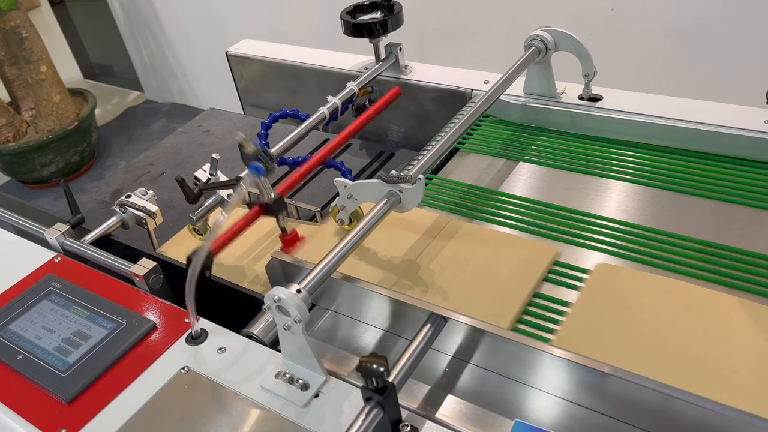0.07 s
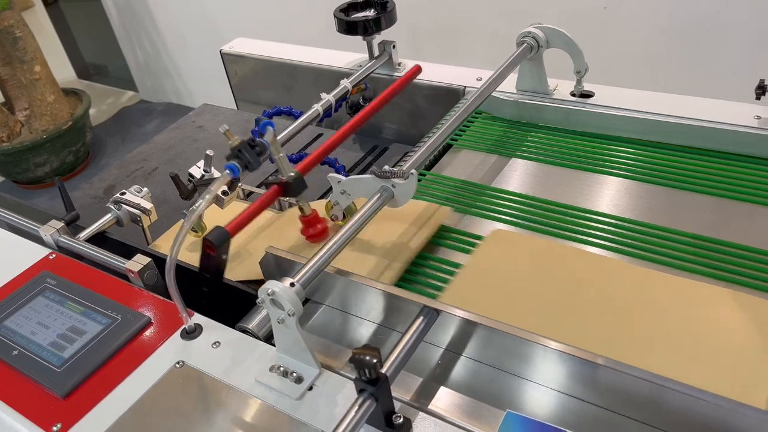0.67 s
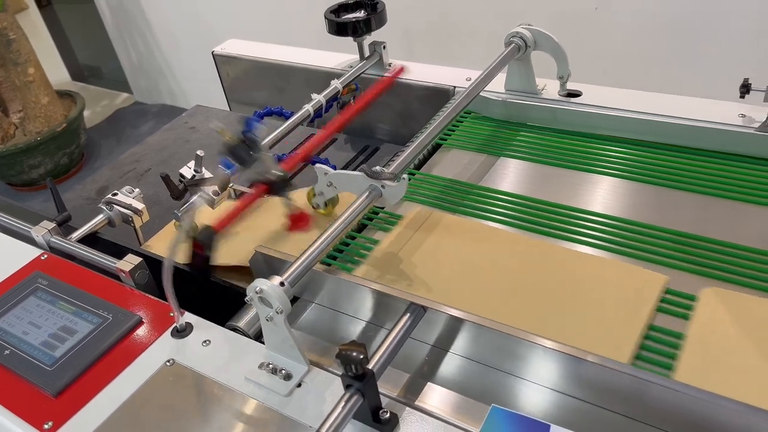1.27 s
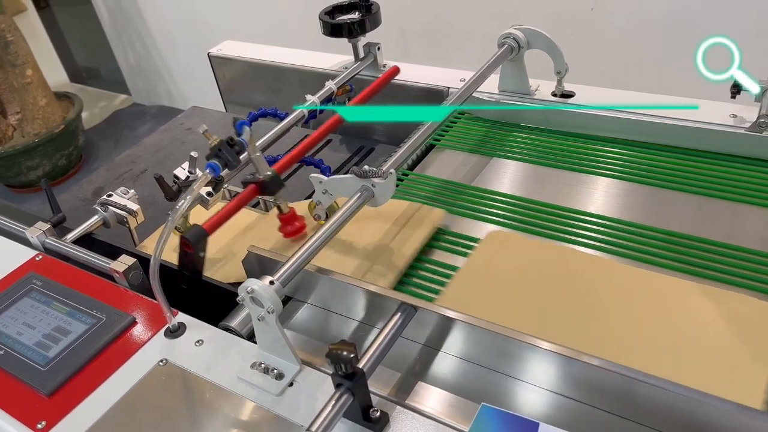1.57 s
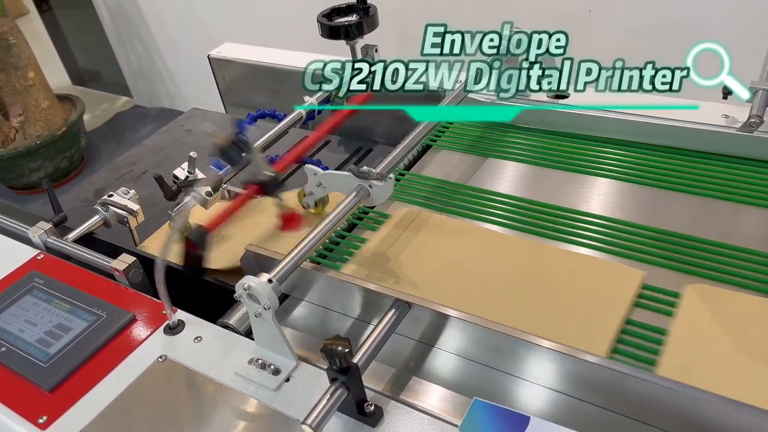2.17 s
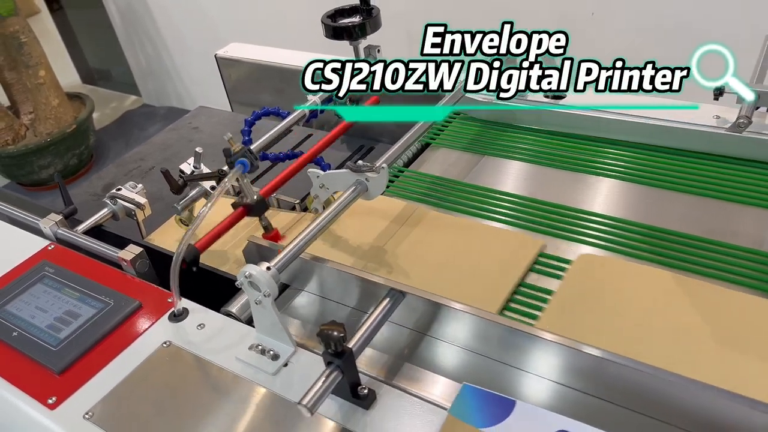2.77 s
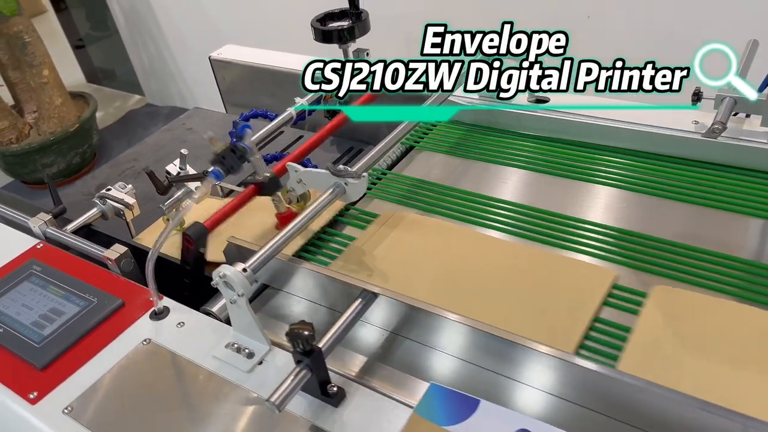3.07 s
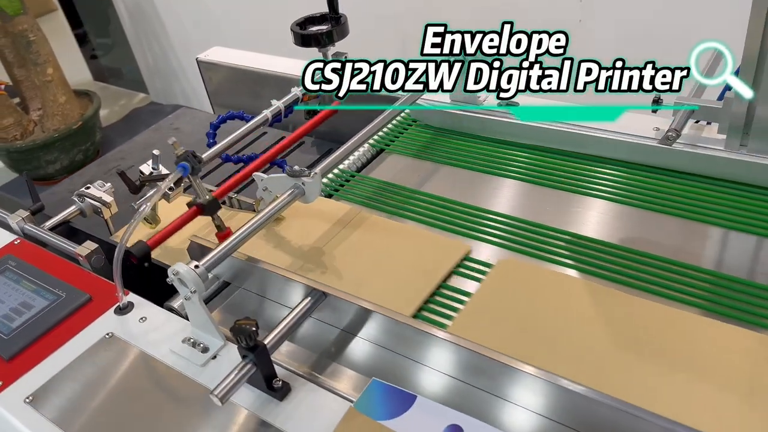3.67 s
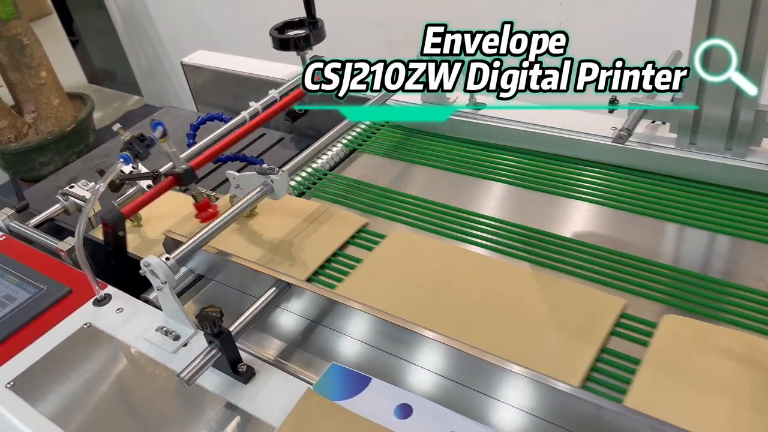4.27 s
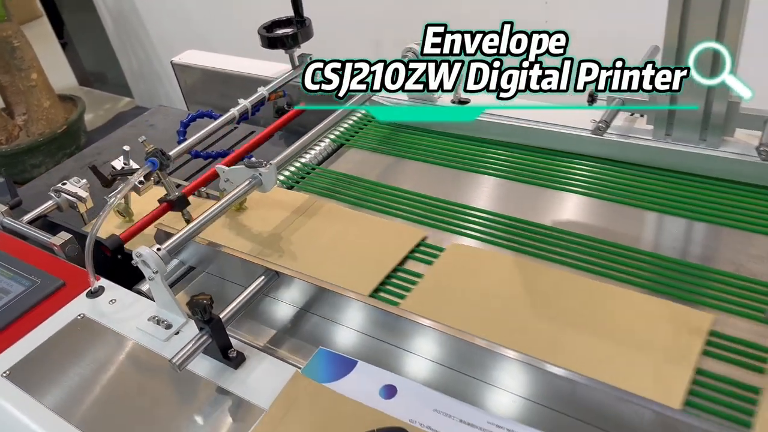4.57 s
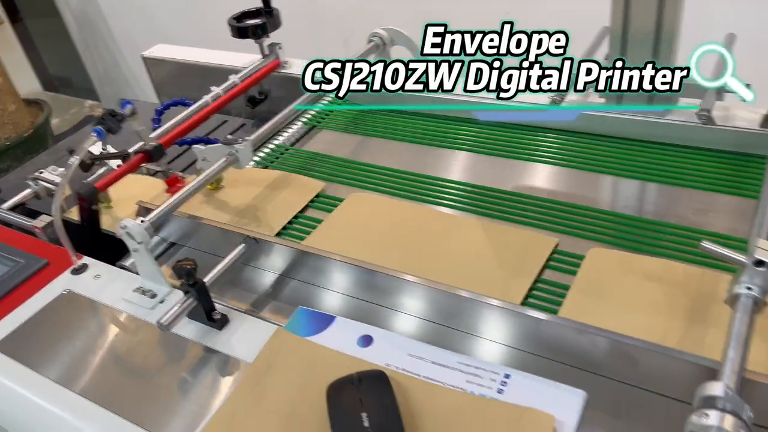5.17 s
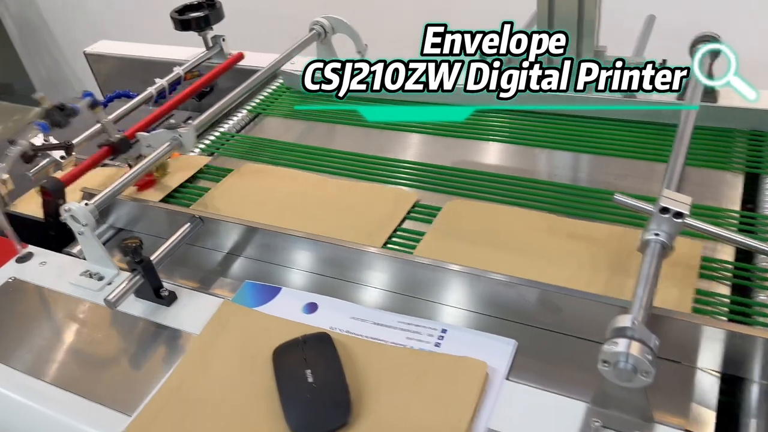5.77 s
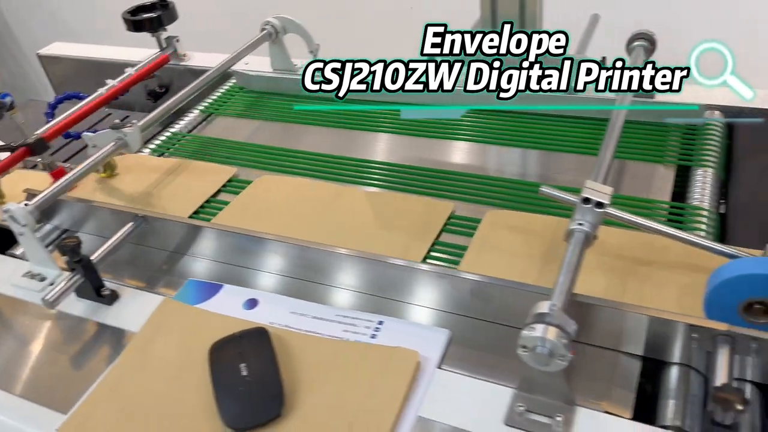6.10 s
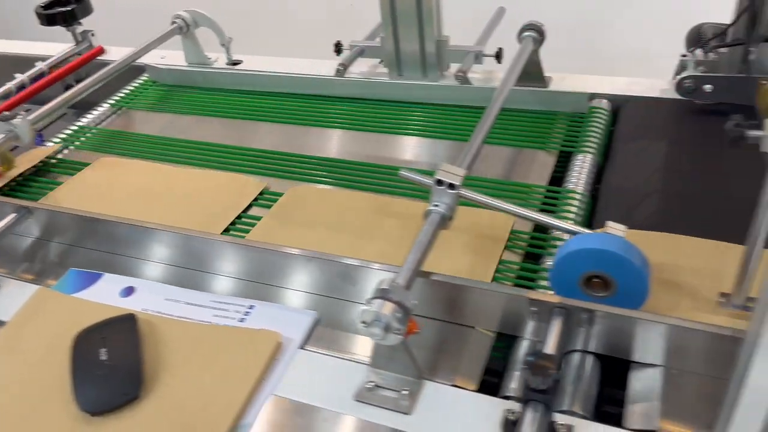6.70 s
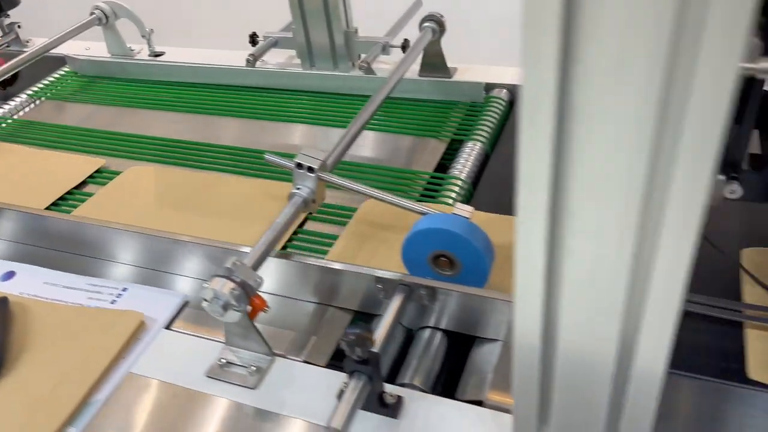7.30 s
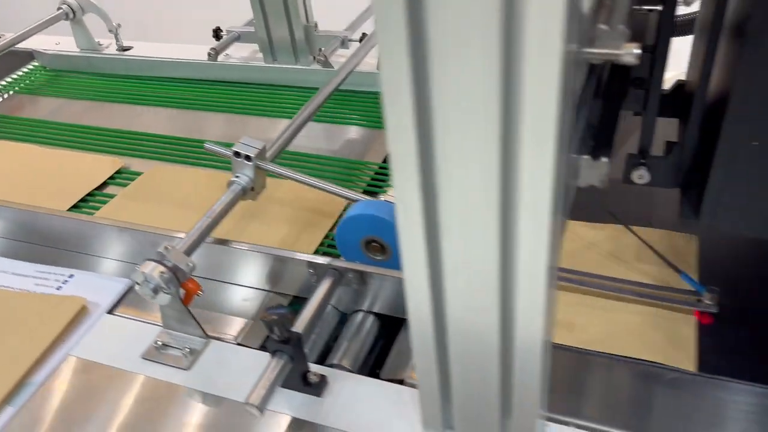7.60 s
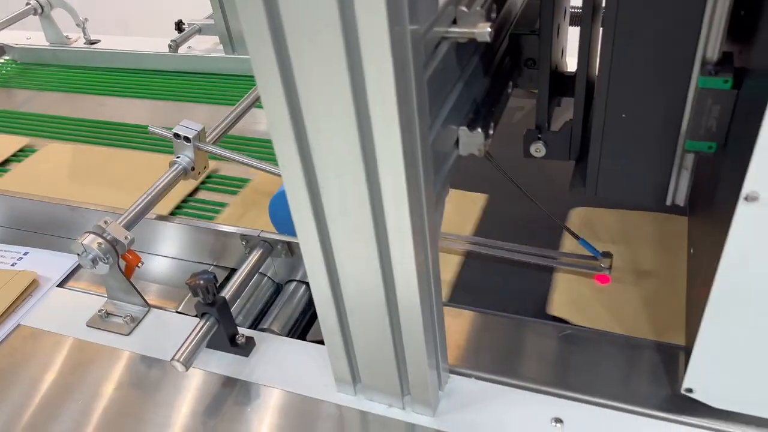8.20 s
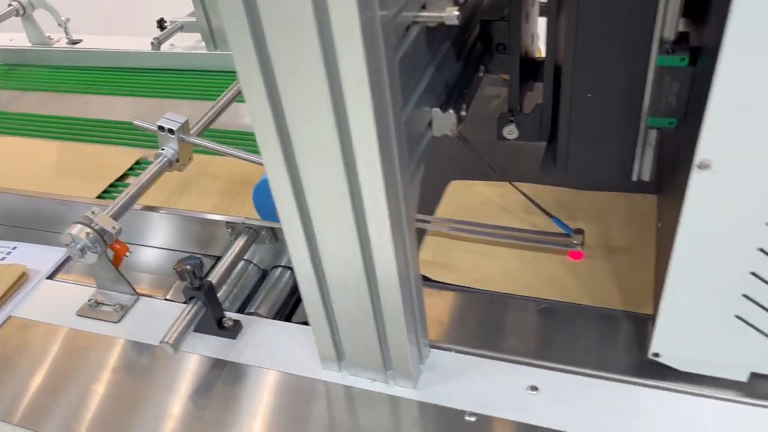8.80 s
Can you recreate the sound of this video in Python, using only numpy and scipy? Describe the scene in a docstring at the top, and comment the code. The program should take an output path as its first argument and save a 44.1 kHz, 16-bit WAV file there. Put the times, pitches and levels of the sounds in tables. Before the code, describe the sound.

An envelope feeder hisses with suction air and clacks in a steady cycle over whining motors and rumbling conveyor belts in a workshop.

```python
"""An envelope feeder runs at about 69 strokes a minute in a hard-walled workshop, heard from a phone
held over it. In each stroke the suction air hisses, the arm knocks through its linkage and drags an
envelope forward, then clacks on its stop, ringing the frame and the steel table. Motors whine and
conveyor belts rumble underneath; towards the end the phone moves over to the humming print unit."""
import sys
import numpy as np
from scipy import signal
from scipy.fft import rfft, irfft, next_fast_len
from scipy.io import wavfile

SR = 44100
rng = np.random.default_rng(int(sys.argv[2]) if len(sys.argv) > 2 else 0)


def wav_out(sig):
    """Save sig, one row per channel (or a flat mono array), as 16-bit PCM at SR to the path in sys.argv[1]."""
    wavfile.write(sys.argv[1], SR, np.round(np.clip(np.atleast_2d(sig).T, -1, 1) * 32767).astype(np.int16))


N = 399105
T = np.arange(N) / SR
BLOW_SAMPLES, KNOCK_SAMPLES = 20480, 4096


def undb(db):
    """Decibels to gain."""
    return np.exp(np.asarray(db) * (np.log(10) / 20))


def fade(t, t60):
    """Full level until t = 0, then down by 60 dB every t60 seconds."""
    return np.exp(-np.log(1000) * np.maximum(t, 0) / t60)


def ramp(t, length):
    """Rise from 0 at t = 0 to 1 at t = length, then hold."""
    return np.clip(t / length, 0, 1)


def over_hz(points, hz):
    """Read (frequency, value) points on a log-frequency axis."""
    at, value = np.transpose(points)
    return np.interp(np.log(hz + 1), np.log(at), value)


def shape(x, gain):
    """EQ x with a gain that is a function of frequency."""
    n = next_fast_len(x.shape[-1], True)
    curve = np.float32(gain(np.fft.rfftfreq(n, 1 / SR)))
    return irfft(rfft(np.float32(x), n) * curve, n)[..., :x.shape[-1]]


def lowpass(x, corner_hz):
    """A gentle treble roll-off, 6 dB down at the corner."""
    return shape(x, lambda hz: 1 / (1 + (hz / corner_hz) ** 2))


def bandpass(x, hz, ratio=1.54):
    """A broad band that reaches `ratio` times above and below hz."""
    band = signal.butter(2, [hz / ratio, hz * ratio], "bandpass", fs=SR, output="sos")
    return signal.sosfilt(band, x)


def white(size):
    """Two unrelated noises at 0 dB per Hz."""
    return rng.standard_normal((2, size)) * np.sqrt(SR / 2)


def noise(spectrum, size=N):
    """Two unrelated noises coloured by (frequency, level) points."""
    return shape(white(size), lambda hz: undb(over_hz(spectrum, hz)))


def resonate(peaks, size=N):
    """Two unrelated noises through (centre, width, level) resonances."""
    gain = lambda hz: sum(undb(db) / (1 + (2 * (hz - f) / width) ** 2) for f, width, db in peaks)
    return shape(white(size), gain)


def phase(hz):
    """Running angle of an oscillator that follows a pitch curve."""
    return 2 * np.pi * np.cumsum(hz) / SR


def drift(rate_hz):
    """Smooth random modulation with a spread of 1, rolling off above rate_hz."""
    step = 32  # samples between control points
    points = shape(rng.standard_normal(N // step + 2), lambda hz: np.exp(-(hz / step / rate_hz) ** 2))
    return np.interp(np.arange(N) / step, np.arange(len(points)), points / points.std())


def add(out, start_s, x):
    """Mix x into out from start_s."""
    i = min(max(int(start_s * SR), 0), N)
    out[:, i:i + x.shape[1]] += x[:, :N - i]


def each_stroke(contour):
    """Repeat a gain contour, a function of the time from the clack, with every stroke."""
    gain, out = contour(np.arange(-SR, SR) / SR), np.zeros(N + 4 * SR)
    for clack_s, *_ in STROKES:
        out[int(clack_s * SR):][:len(gain)] += gain
    return out[SR:SR + N]


def alike(draw, carry=0.87):
    """A noise per stroke, each close to the last: the same parts meet while the phone moves a little."""
    out = [draw()]
    for _ in STROKES[1:]:
        out.append(carry * out[-1] + np.sqrt(1 - carry ** 2) * draw())
    return np.array(out)


# Bed of belts, rollers and fans: (frequency [Hz], level [dB/Hz])
BELT_SPECTRUM = [(22, -119), (48, -54), (100, -58.5), (170, -58), (230, -55.5), (320, -62), (760, -62),
                 (900, -64.5), (1550, -65.5), (1800, -69), (2900, -71.5), (3400, -79), (4600, -80),
                 (6000, -86.5), (14300, -98.5), (15600, -115)]
def conveyor(chatter_db=1.32, lull_db=-4, lull_lead_s=0.212, lull_s=0.04, rumble_hz=900):
    """The belts rumble with a slight chatter; the low end lulls while the arm stands at the stack."""
    belts = noise(BELT_SPECTRUM) * undb(chatter_db * drift(19))
    standing = each_stroke(lambda t: np.exp(-((t + lull_lead_s) / lull_s) ** 2))
    return belts + lowpass(belts, rumble_hz) * (undb(lull_db * standing) - 1)


# Whirr of the roller bearings: (centre [Hz], width [Hz], level [dB/Hz])
BEARING_PEAKS = [(2904, 66, -75), (4580, 490, -82)]
# Chirps of dry rollers: (time [s], pitch [Hz], half length [s], level [dB])
ROLLER_CHIRPS = [(4.37, 4530, 0.18, -50), (6.934, 2920, 0.013, -35), (7.048, 2950, .016, -37),
                 (7.186, 3010, 0.011, -36)]
def rollers(swell_db=2, pitch_stray=0.018):
    """The roller bearings whirr, coming and going; a dry one sings or chirps on a few turns."""
    jitter, chirps = 1 + pitch_stray * drift(116.5), 0
    for peak_s, hz, half_s, db in ROLLER_CHIRPS:
        swell = np.exp(-np.minimum(np.abs(T - peak_s) / half_s, 10) ** 2)
        chirps = chirps + undb(db) * swell * np.sin(phase(hz * jitter))
    whirr = resonate(BEARING_PEAKS) * undb(swell_db * drift(3.8))
    return whirr + np.array([chirps, chirps / 2])


# Hum of the print unit's housing: (centre [Hz], width [Hz], level [dB/Hz])
HOUSING_PEAKS = [(224, 81, -57), (660, 170, -72)]
def print_unit(enter_s=5.75, approach_s=0.58, throb_db=2):
    """The print unit hums in its housing and fades in as the phone moves over to it."""
    return resonate(HOUSING_PEAKS) * ramp(T - enter_s, approach_s) * undb(throb_db * drift(7.4))


# Drone of the motors: (pitch [Hz], level [dB], wander [Hz])
MOTOR_TONES = [(111, -42, 3), (385, -49, 7), (500.3, -43.5, 2.5), (646, -46, 6), (1497, -48.5, 6),
               (1997, -53, 7), (2524, -51, 1.5)]
def motors(waver_db=4.0):
    """Motor tones wander slightly and swell as the phone moves through their standing waves."""
    out = np.zeros((2, N))
    for hz, db, wander_hz in MOTOR_TONES:
        angle = phase(hz + wander_hz * drift(12.32))
        for channel in out:
            tone = undb(waver_db * drift(1.3)) * np.sin(angle + drift(0.56))
            channel += undb(db) * tone / tone.std()
    return out


# Fader ride of the conveyor motor along the phone's path: (time [s], level [dB])
WHINE_RIDE = [(0.0, -40), (0.2, -34), (0.6, -40), (0.7, -44), (0.88, -47), (0.97, -39), (1.48, -36),
              (1.62, -36), (1.87, -35.5), (1.95, -44), (2.22, -32), (2.35, -43), (2.47, -35.5), (2.6, -44),
              (2.72, -33.5), (2.9, -33), (3.05, -45), (3.28, -31), (3.45, -40.5), (3.55, -43), (3.78, -39),
              (4.03, -37), (4.3, -46), (4.45, -37.5), (4.72, -46), (4.9, -37), (5.18, -37), (5.45, -43.5),
              (5.8, -38), (6.0, -35), (6.15, -40), (6.6, -46), (6.88, -36), (7.4, -37.5), (7.9, -40),
              (8.42, -40), (8.63, -51), (8.82, -39), (9.05, -60)]
def motor_whine(pitch_hz=998, wander_hz=3, rough=0.26, side_db=-2):
    """The conveyor motor sings, a little rough, swelling and dropping out as the phone moves."""
    angle = phase(pitch_hz + wander_hz * drift(8.1))
    voice = lambda: (1 + rough * drift(39)) * np.sin(angle + drift(0.87) + rough * drift(38))
    level = undb(np.interp(T, *np.transpose(WHINE_RIDE)))
    return np.sqrt(2) * level * np.array([voice(), undb(side_db) * voice()])


def panel_echoes(x, places=5, walls=14, echo=0.75, above_hz=1700, delay_s=(0.0007, 0.016)):
    """Steel panels throw back short echoes that comb the treble, differently along the phone's path."""
    share = lambda hz: echo * hz ** 2 / (hz ** 2 + above_hz ** 2)  # long waves bend round the panels
    treble, echoes = shape(x, share) / np.sqrt(walls), np.zeros(x.shape)
    position = T / T[-1] * (places - 1)
    for place in range(places):
        crossfade = np.sqrt(np.clip(1 - np.abs(position - place), 0, 1))
        for channel, source in zip(echoes, treble):
            lags = (SR * rng.uniform(*delay_s, walls)).astype(int)
            channel += crossfade * sum(int(rng.choice([-1, 1])) * np.roll(source, lag) for lag in lags)
    return shape(x + echoes, lambda hz: 1 / np.sqrt(1 + share(hz) ** 2))  # keeps the tonal balance


def pull(t, lead_s=0.22, rise_s=0.032, growth_db_per_s=34, t60=0.93):
    """The drive takes up the envelope, pulls ever harder until the clack, then lets go."""
    return ramp(t + lead_s, rise_s) * undb(growth_db_per_s * np.minimum(t, 0)) * fade(t, t60)


# Paper sliding over the stack: (frequency [Hz], level [dB/Hz])
PAPER_SPECTRUM = [(120, -56), (450, -56.5), (900, -64), (1200, -56.5), (1550, -66.5), (2400, -64.5),
                  (3400, -65), (6000, -73.5), (12000, -111)]
# Hum of the drive under load: (centre [Hz], width [Hz], level [dB/Hz])
DRIVE_PEAKS = [(499, 21, -55.5), (611, 19, -52.5), (768, 54, -50)]
def paper_feed(scrape_db=0.9, rub_hz=775, rub_stray_hz=7, rub_db=-35, rub_lead_s=0.15, rub_s=0.091):
    """The envelope rubs as it is gripped; the drive hums and the paper scrapes as the arm pulls."""
    paper = noise(PAPER_SPECTRUM) * undb(scrape_db * drift(66))
    grip = each_stroke(lambda t: np.exp(-((t + rub_lead_s) / rub_s) ** 2))
    rub = undb(rub_db) * grip * np.sin(phase(rub_hz + rub_stray_hz * drift(23.4)))
    return (resonate(DRIVE_PEAKS) + paper) * each_stroke(pull) + np.array([rub, rub / 2])


# Groans of two rubbing strokes: (time [s], half length [s], level [dB])
RUB_GROANS = [(0.394, 0.02, -23), (3.983, 0.03, -17.5)]
def groans(pitch_hz=500, scoop_hz=16, scoop_s=0.063, linger=0.68, room_t60=0.91, side_share=0.56):
    """A short rubbing tone scoops up to its pitch just before the clack and lingers in the room."""
    tone = 0
    for peak_s, half_s, db in RUB_GROANS:
        swell = 1 / (1 + ((T - peak_s) / half_s) ** 4)
        tail = linger * (T > peak_s) * fade(T - peak_s, room_t60)
        hz = pitch_hz - scoop_hz * ramp(peak_s + half_s - T, scoop_s) + 4 * drift(24)
        tone = tone + undb(db) * np.maximum(swell, tail) * np.sin(phase(hz))
    return np.array([tone, -side_share * tone])


# Breathy bands in the hiss: (centre [Hz], level [dB])
HISS_BANDS = [(3400, -47), (3800, -42), (4480, -46.5)]
def hiss_bands(pitch_stray=0.04, swell_db=0.5, breath_hz=90):
    """Faint, breathy bands of noise wander around 3.4-4.5 kHz in the hiss and swell slightly."""
    out = 0
    for hz, db in HISS_BANDS:
        carrier = np.sin(phase(hz * (1 + pitch_stray * drift(5))))
        level = undb(db + swell_db * drift(3))
        breath = np.array([drift(breath_hz), drift(breath_hz)])
        out = out + level * carrier * breath
    return np.sqrt(2) * out


OPEN_LEAD_S, COVER_LEAD_S, SHUT_LEAD_S = 0.36, 0.24, 0.028  # valve opens, cup is covered, valve shuts
def air_flow(t, covered_db, covering_s=0.034, t60=0.32):
    """The valve spits open, the jet builds, dips under the envelope and dies once the valve shuts."""
    spit_s, spit_share, jet_delay_s, jet_rise_s = 0.0028, 0.49, 0.015, 0.011
    valve_age = t + OPEN_LEAD_S
    jet_age = np.maximum(valve_age - jet_delay_s, 0)
    opening = ramp(valve_age, spit_s) * (1 - (1 - spit_share) * np.exp(-jet_age / jet_rise_s))
    dip = undb(covered_db * ramp(t + COVER_LEAD_S, covering_s))
    return opening * dip * fade(t + SHUT_LEAD_S, t60)


# Hiss of the suction nozzle: (frequency [Hz], level [dB/Hz])
JET_SPECTRUM = [(300, -78), (1400, -65.5), (2600, -70.5), (3500, -68.5), (5000, -70), (6000, -70),
                (7100, -71.5), (8000, -65.5), (9000, -72), (10000, -76), (10700, -80), (12000, -78),
                (14300, -78), (15600, -112)]
def suction(beam_hz=8000, build_s=0.0084, flutter_db=1.0):
    """The nozzle beams treble at the phone, brighter in some strokes; lower hiss builds in the room."""
    clack_s, _, _, bright_db, _ = np.transpose(STROKES)
    jet = noise(JET_SPECTRUM)
    beam = shape(jet, lambda hz: ramp(hz - beam_hz, beam_hz / 10))
    brightness = undb(np.interp(T, clack_s - COVER_LEAD_S, bright_db))
    beam_gain = each_stroke(lambda t: air_flow(t, covered_db=-3)) * brightness
    room_flow = each_stroke(lambda t: air_flow(t, covered_db=-1.7))
    pole = np.exp(-1 / (build_s * SR))
    room_gain = signal.lfilter([1 - pole], [1, -pole], room_flow)
    hiss = beam * beam_gain + (jet - beam + hiss_bands()) * room_gain
    return hiss * undb(flutter_db * drift(48))


# Accents from a single ringing panel: (time [s], pitch [Hz], level [dB])
PANEL_PINGS = [(3.155, 1800, -24), (7.54, 1243, -16)]
def panel_pings(t60=0.3, side_share=0.6):
    """Now and then the blow makes one panel ring above the rest."""
    out, t = np.zeros((2, N)), T[:BLOW_SAMPLES]
    for start_s, hz, db in PANEL_PINGS:
        ring = undb(db) * np.sin(2 * np.pi * hz * t) * fade(t, t60)
        add(out, start_s, np.array([ring, side_share * ring]))
    return out


# Hollow body of the cabinet: (centre [Hz], width [Hz], level [dB/Hz])
CABINET_PEAKS = [(255, 44, -40.5), (440, 49, -48), (640, 130, -41)]
def cabinet_thumps(build_s=0.004, t60=0.35):
    """The cabinet takes up each blow a moment later with a hollow thump."""
    t = T[:BLOW_SAMPLES]
    return alike(lambda: resonate(CABINET_PEAKS, BLOW_SAMPLES)) * ramp(t, build_s) * fade(t, t60)


# Crowded resonances of the sheet-steel table: (centre [Hz], width [Hz], level [dB/Hz])
TABLE_PEAKS = [(1514, 77, -55.5), (1655, 110, -54.5), (2360, 340, -63.5), (3310, 340, -68.5)]
def table_clangs(bite_db=2, bite_t60=0.054, shimmer_t60=0.8):
    """The table clangs under each clack: a bright first bite, then a longer shimmer."""
    t = T[:BLOW_SAMPLES]
    decay = undb(bite_db) * fade(t, bite_t60) + fade(t, shimmer_t60)
    return alike(lambda: resonate(TABLE_PEAKS, BLOW_SAMPLES)) * decay


# Resonances of the arm's stop: (centre [Hz], width [Hz], level [dB/Hz])
STOP_PEAKS = [(520, 250, -43), (1420, 420, -43.5), (1820, 500, -47.5), (3400, 880, -47.5)]
def stop_raps(peak_s=0.0019):
    """The stop gives a tight rap that peaks just after contact and is gone at once."""
    age = T[:BLOW_SAMPLES] / peak_s
    return alike(lambda: resonate(STOP_PEAKS, BLOW_SAMPLES)) * age * np.exp(1 - age)


# Modes of the feeder frame: (pitch [Hz], level [dB], decay by 60 dB [s])
FRAME_MODES = [(110.5, -27, 0.67), (144, -38, 0.48), (262.8, -25.5, 0.65), (383.7, -23, 0.36),
               (505, -27, 0.87), (553, -29, 0.43), (656.4, -27.5, 0.67), (1225, -29, 0.19),
               (1333, -18.5, 0.12), (1473, -33.5, 1), (1535, -31, 0.51), (1640, -42, 0.29),
               (1693, -19, 0.18), (1790, -23.5, 0.19), (2050, -30, 0.11), (3580, -18, 0.038)]
def frame_rings(detune=0.0041, scatter_db=2.0, turn_rad=0.45):
    """The frame's modes ring a little differently each stroke, as the arm never lands quite alike."""
    hz, db, t60 = np.transpose(FRAME_MODES)
    angles, out = 2 * np.pi * rng.random((2, len(hz))), []
    for _ in STROKES:
        angles = angles + turn_rad * rng.standard_normal(angles.shape)
        pitches = hz * (1 + detune * rng.standard_normal(len(hz)))
        levels = undb(db + scatter_db * rng.standard_normal(angles.shape))
        poles = 2j * np.pi * pitches - np.log(1000) / t60
        modes = np.exp(np.outer(poles, T[:BLOW_SAMPLES]))
        out.append(np.imag((levels * np.exp(1j * angles)) @ modes))
    return np.array(out)


# Attack of metal on metal: (frequency [Hz], level [dB/Hz])
CRACK_SPECTRUM = [(150, -57), (500, -36), (1100, -46), (1580, -55), (2100, -45), (2900, -52), (3400, -51),
                  (6000, -56.5), (8500, -48), (11500, -65), (13500, -54), (16000, -61)]
def cracks(contact_s=0.00065, t60=0.03, tick_hz=2000, flex_s=0.0038):
    """Contact starts as a bright tick, slower bending waves follow, and the very top snaps briefly."""
    snap_hz, snap_db, snap_t60 = 8000, -1.5, 0.012
    t = T[:BLOW_SAMPLES]
    burst = alike(lambda: noise(CRACK_SPECTRUM, BLOW_SAMPLES))
    crack = (burst - lowpass(burst, tick_hz) * np.exp(-t / flex_s)) * fade(t, t60)
    snap = undb(snap_db) * (crack - lowpass(crack, snap_hz)) * fade(t, snap_t60)
    return (crack + snap) * ramp(t, contact_s)


# Tail of panels and room after a blow: (frequency [Hz], level [dB/Hz])
WASH_SPECTRUM = [(35, -66), (100, -45), (200, -52.5), (450, -49), (700, -55), (1100, -51), (1570, -50),
                 (2000, -55), (2900, -63), (3400, -60), (6000, -64), (10000, -75), (15500, -81)]
def frame_blows(build_s=0.0049, split_hz=1800, low_t60=0.75, high_t60=0.44):
    """Each blow cracks, then the frame and the room bloom and die away; the wash loses treble first."""
    t = T[:BLOW_SAMPLES]
    wash = alike(lambda: noise(WASH_SPECTRUM, BLOW_SAMPLES))
    lows = lowpass(wash, split_hz)
    body = frame_rings() + lows * fade(t, low_t60) + (wash - lows) * fade(t, high_t60)
    return cracks() + body * (1 - np.exp(-t / build_s))


# Linkage knocks in every stroke: (time from the clack [s], level [dB], thud centre [Hz])
LINKAGE_KNOCKS = [(-.347, 1.5, 221), (-.214, -2, 223), (-.139, 2.5, 220), (-.116, -11, 850),
                  (-.06, -2, 446), (-.04, 8, 138), (-.018, -9, 1470), (.04, 2.5, 110), (.07, -8.5, 427.3),
                  (.141, -2, 266)]
# Cue list of the feeder's strokes, timed by the arm landing on its stop:
# (time [s], clack level [dB], table clang [dB], hiss treble [dB], cabinet thump [dB])
STROKES = [(0.5208, -0.5, 1, 6, -19), (1.397, -1, 3, 4, -7.5), (2.2697, -0.5, 1.5, 4.5, -6),
           (3.152, 0, 4.5, 3.5, -15), (4.026, -0.5, 7, 4, -5), (4.907, -1.5, 5, 3.5, -4),
           (5.788, -1.3, 5, 6, -4), (6.667, -1, 5, 4, -3.5), (7.5387, -0.5, 0, 4, -1),
           (8.411, -1.5, 0, 2.5, 3), (9.291, 0, 0, 2.5, 0)]
def feeder_arm(knock_damp_s=0.021, uneven_db=1):
    """The arm clacks on its stop; its linkage gives duller, damped knocks on the same frame."""
    out, blows = np.zeros((2, N)), frame_blows()
    layers = zip(STROKES, blows + stop_raps(), table_clangs(), cabinet_thumps())
    for (clack_s, clack_db, clang_db, _, thump_db), clack, clang, thump in layers:
        add(out, clack_s, undb(clack_db) * clack + undb(clang_db) * clang + undb(thump_db) * thump)
    damping = np.exp(-T[:KNOCK_SAMPLES] / knock_damp_s)
    for offset_s, db, thud_hz in LINKAGE_KNOCKS:
        knocks = bandpass(blows[..., :KNOCK_SAMPLES], thud_hz) * damping
        for (clack_s, *_), knock in zip(STROKES, knocks):
            add(out, clack_s + offset_s, undb(db + uneven_db * rng.standard_normal()) * knock)
    return out


# Stereo image, negative where the microphones sit half a wave apart: (frequency [Hz], likeness [ratio])
MIC_LIKENESS = [(60, 1), (120, 0.97), (250, 0.8), (500, 0.63), (1200, 0.089), (2400, 0.37), (4400, 0.29),
                (7000, 0.22), (7650, -1), (9350, -1), (10000, 0.45), (12000, 1), (15000, -1.1)]
# Pan across the spectrum: (frequency [Hz], left minus right [dB])
MIC_BALANCE = [(60, 0), (150, -1), (600, -1), (2200, 1), (4200, 4.5), (8000, 0)]
def scene():
    """Mix all sources as mid and side, then spread them to the left and right microphones."""
    bed = rollers() + print_unit() + motors() + motor_whine()
    reflected = panel_echoes(conveyor() + paper_feed() + suction())
    mix = bed + reflected + groans() + panel_pings() + feeder_arm()
    correlation = lambda hz: np.clip(over_hz(MIC_LIKENESS, hz), -0.995, 0.995)
    mid, side = shape(mix, lambda hz: np.sqrt((1 + np.outer([1, -1], correlation(hz))) / 2))
    pan = lambda hz: undb(np.outer([0.5, -0.5], over_hz(MIC_BALANCE, hz)))
    return shape(np.array([mid + side, mid - side]), pan)


def record(dry, lead_silence_s=0.045, low_cut_hz=42, high_cut_hz=15750):
    """The sound starts after 45 ms of silence; the phone cuts the deepest bass and the top."""
    faded_in = dry * ramp(T - lead_silence_s, 0.003)
    low_cut = signal.butter(5, low_cut_hz, "high", fs=SR, output="sos")
    high_cut = signal.ellip(10, 0.2, 90, high_cut_hz, fs=SR, output="sos")
    return signal.sosfilt(high_cut, signal.sosfilt(low_cut, faded_in))


dry = scene()
out = record(dry)
wav_out(out)
```